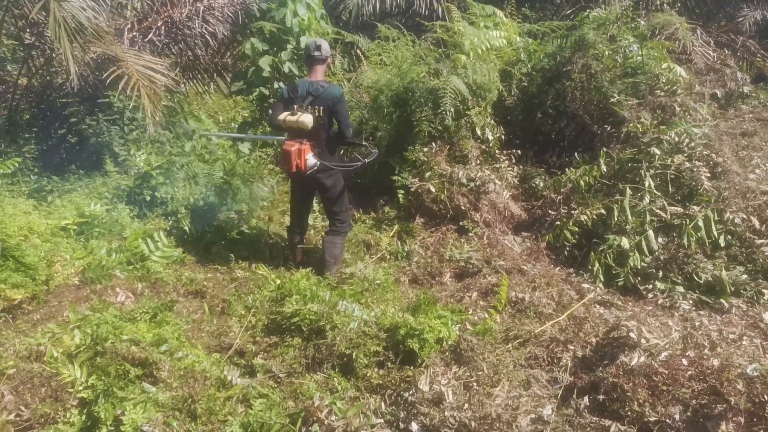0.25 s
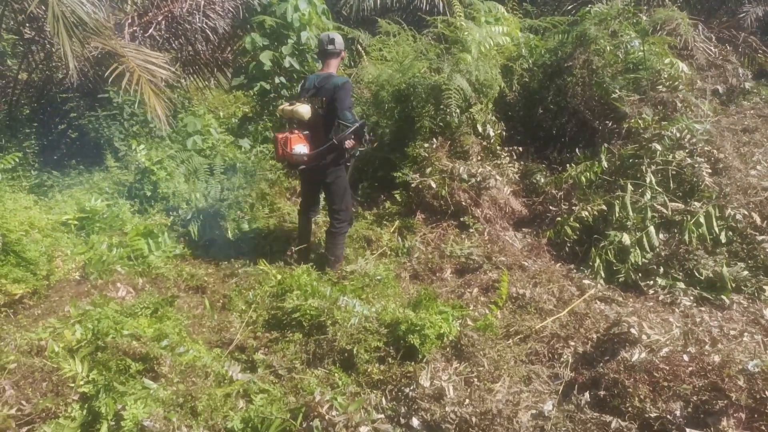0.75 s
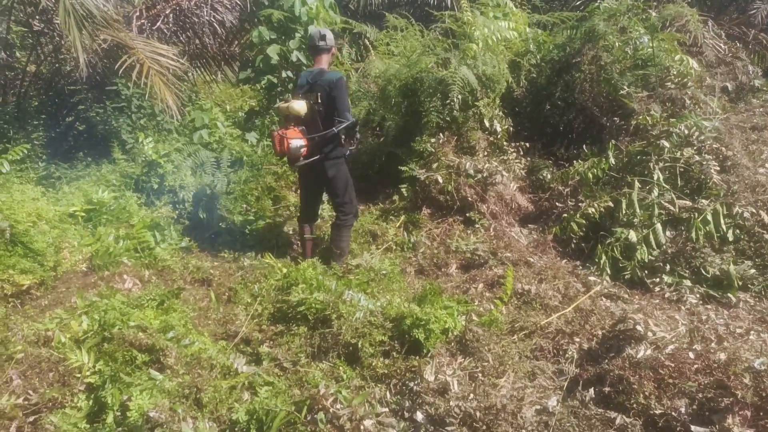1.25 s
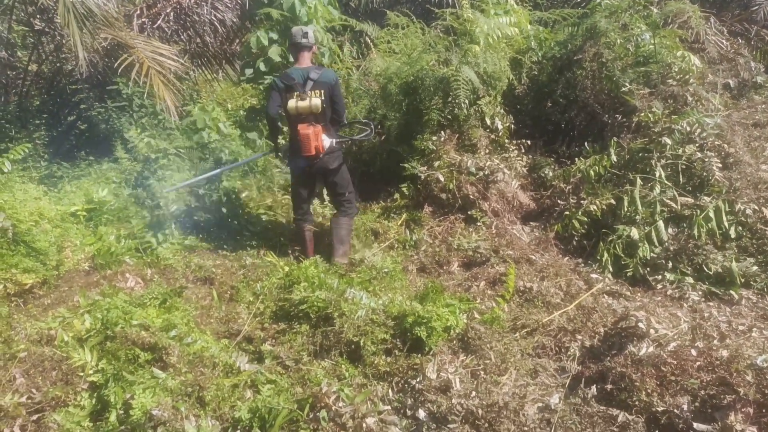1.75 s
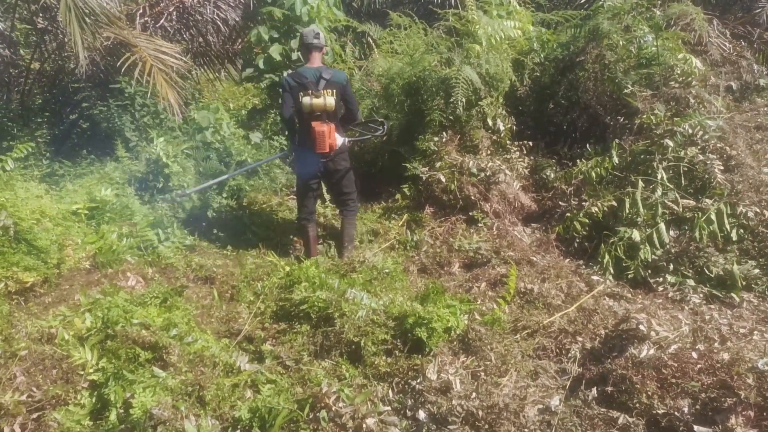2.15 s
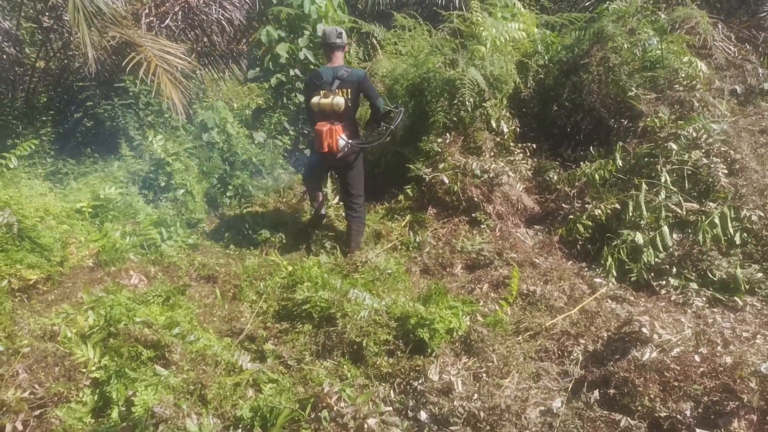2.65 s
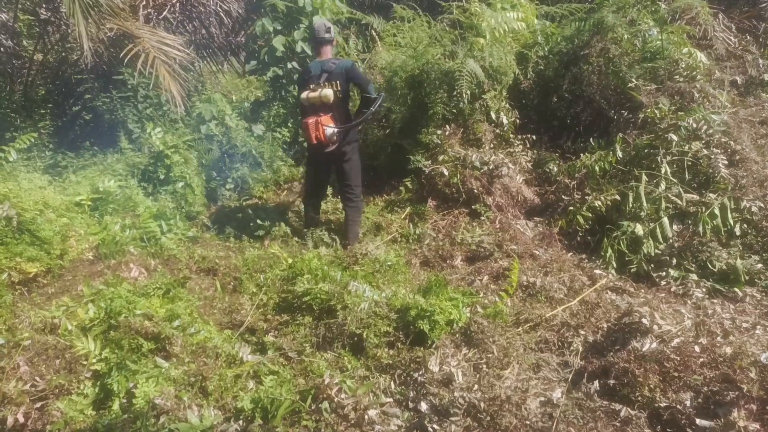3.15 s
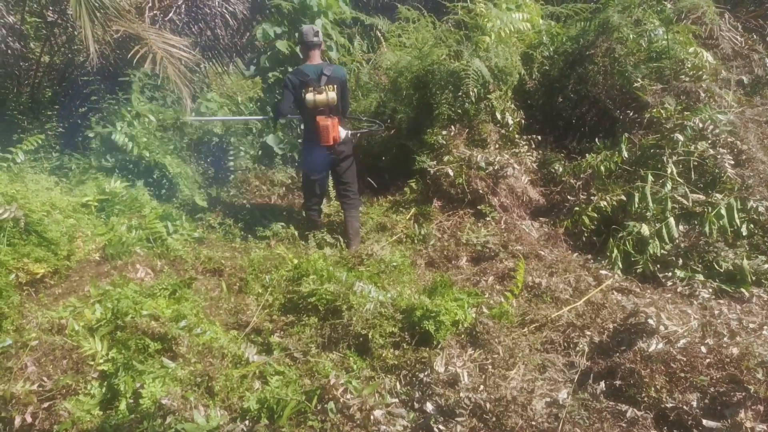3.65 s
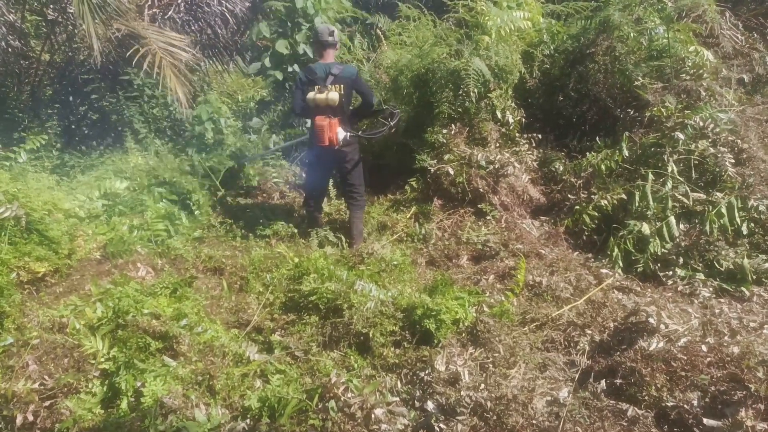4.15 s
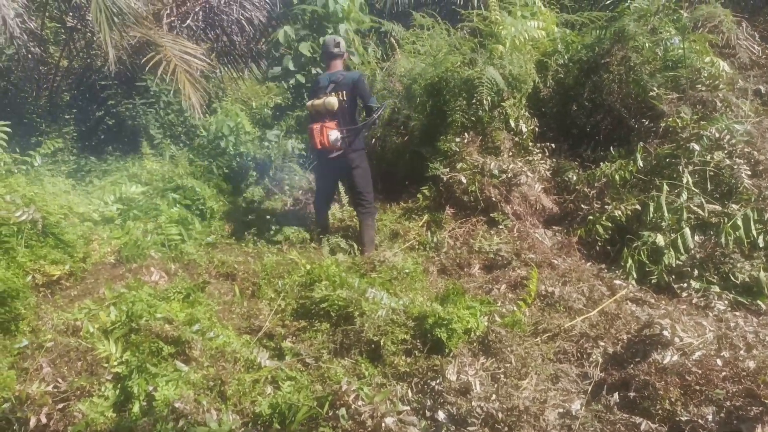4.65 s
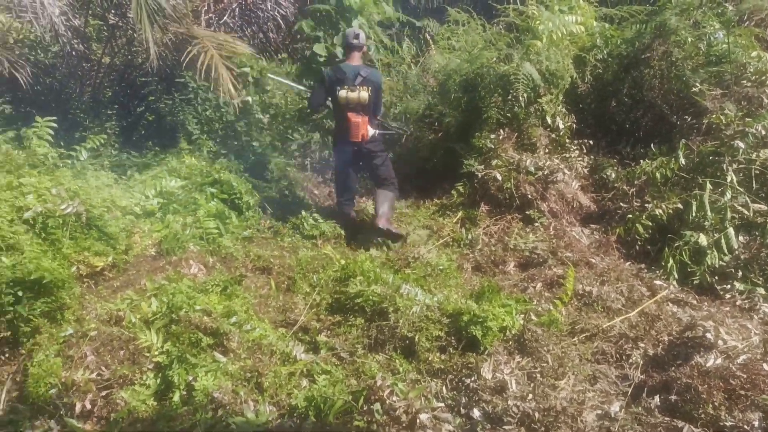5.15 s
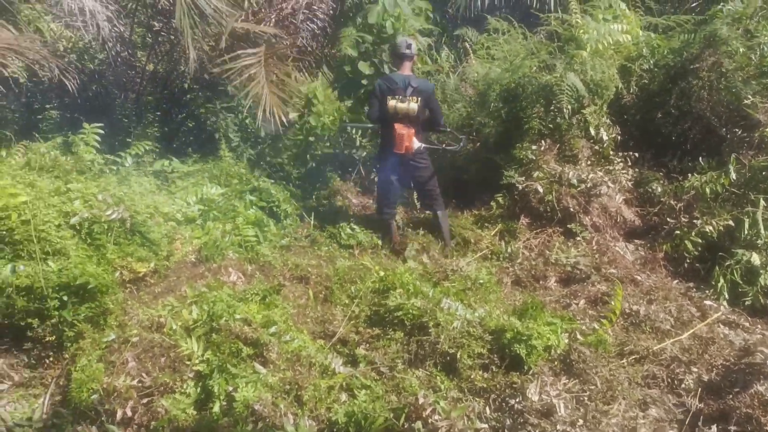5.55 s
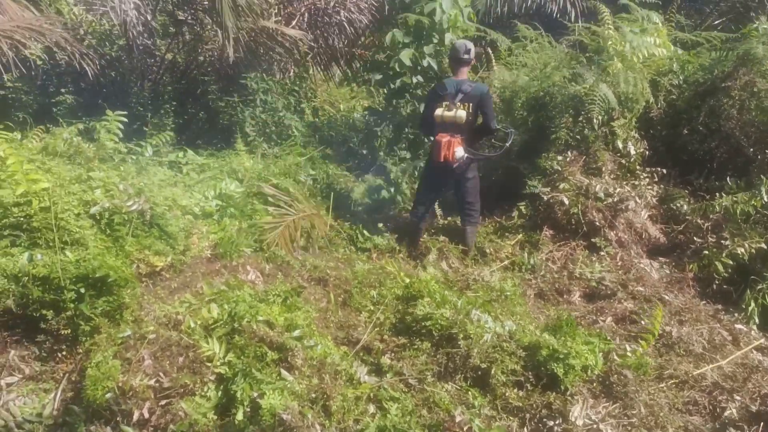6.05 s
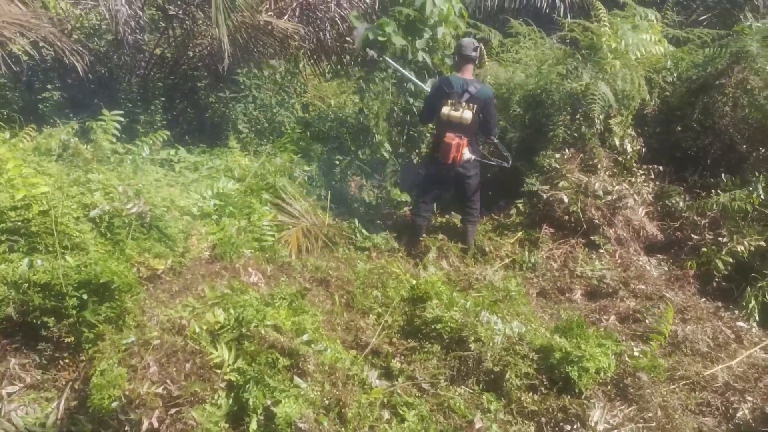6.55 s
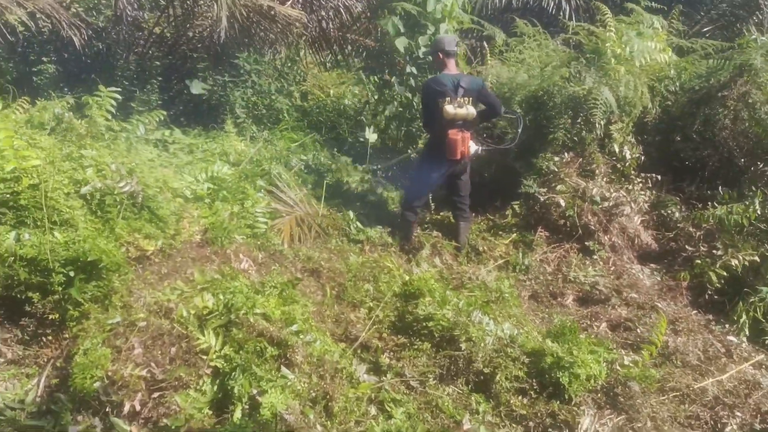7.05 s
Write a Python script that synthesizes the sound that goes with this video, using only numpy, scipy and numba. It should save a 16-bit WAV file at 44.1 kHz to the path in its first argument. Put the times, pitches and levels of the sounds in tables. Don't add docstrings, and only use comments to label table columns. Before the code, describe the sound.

Already running at 0 s, a backpack two-stroke brush cutter gives a hard, nasal, sputtering rasp a few metres from a phone outdoors. It fires about every second turn, often slipping a beat, so a rough burble sits under the buzzing stroke tones. Drive parts rattle and the blade hisses in grass and ferns, with short brighter swells in stems that briefly duck the engine. Small surges come in the first second and around 1.3 s; it steadies lower near 2 s, where a thin casing ring sings. Revs race around 3.3 s, sag by 3.7 s, climb again to about 4.8 s, and drop sharply after 5 s. From 5.3 s the stereo image shifts slightly as pitch surges repeatedly, near 5.7, 6.05 and 6.8 s, the panel ringing again. Bushes add a short dull echo over very faint low rumble. The engine is racing upward at 7.3 s, ending abruptly.

```python
import sys
import numpy as np
from scipy import signal
from scipy.fft import rfft, irfft
from scipy.io import wavfile
from scipy.ndimage import uniform_filter1d, map_coordinates
from numba import njit

SR = 44100
rng = np.random.default_rng(int(sys.argv[2]) if len(sys.argv) > 2 else 0)


def transcribe(signal):
    frames = np.atleast_2d(signal).T
    limited = np.clip(frames, -1, 1)
    pcm = np.round(limited * 32767).astype(np.int16)
    wavfile.write(sys.argv[1], SR, pcm)


def invert_db(level):
    return 10 ** (np.asarray(level, dtype=float) / 20)


N = 321489
TIME_S = np.arange(N) / SR
BIN_HZ = np.maximum(np.arange(N // 2 + 1) * SR / N, 1)
PORT_LAG_S, ENGINE_LAG_S = 0.0003047, 0.00016


def level(x, db):
    return x * invert_db(db) / np.sqrt(np.mean(x ** 2))


@njit
def svf(x, hz, width):
    y, b, l = np.empty(len(x)), 0., 0.
    g, k = np.tan(np.pi * hz / SR), width / hz
    for i in range(len(x)):
        v = (b + g * (x[i] - l)) / (1 + g * (g + k))
        b, l, y[i] = 2 * v - b, l + 2 * g * v, k * v
    return y


def curves(table):
    s, *columns = np.transpose(table)
    return [np.interp(TIME_S, s, c) for c in columns]


def walk(rate_hz):
    k = int(SR / rate_hz)
    held = np.repeat(rng.standard_normal(N // k + 1), k)[:N]
    return 1.467 * uniform_filter1d(uniform_filter1d(held, k), k)


def swells(at, size, rise, hold, fall):
    total = np.zeros(N)
    for a, s, r, h, f in np.broadcast(at, size, rise, hold, fall):
        total += np.interp(TIME_S, [a - r, a, a + h, a + h + f], [0, s, s, 0])
    return total


def ports(hz, table):
    points, *db = np.transpose(table)
    return np.array([invert_db(np.interp(np.log(hz), np.log(points), d)) for d in db])


def colour(pair, table):
    late = np.exp(-2j * np.pi * BIN_HZ * PORT_LAG_S * np.array([[0], [1]]))
    return irfft(rfft(pair) * ports(BIN_HZ, table) * late, N)


def noise_pair(likeness):
    common, left, right = rng.standard_normal((3, N))
    return np.sqrt(likeness) * common + np.sqrt(1 - likeness) * np.array([left, right])


def pulse_train(where, size):
    out, whole = np.zeros(N + 1), np.clip(where, 0, N - 1).astype(int)
    np.add.at(out, whole, size * (1 - where % 1))
    np.add.at(out, whole + 1, size * (where % 1))
    return out[:N]


# start in seconds, hiss swell in dB, hold in seconds, gain duck in dB.
STEM_BITES = [(0.032, -0.5, 0.016, 3.5), (0.144, 5, 0.011, 2), (0.7, 4.5, 0.033, 2.5),
              (0.784, 2.5, 0.07, 1.5), (0.924, 1, 0.035, -1), (1.051, 0, 0.038, 0), (1.485, 0.8, 0.18, 2),
              (2.35, 1.5, .05, -0.5), (2.488, 5.5, 0.11, 4), (2.62, 3.5, 0.11, 3), (2.763, 5.5, 0.04, 3),
              (3.036, 2.1, 0.033, 1.5), (3.37, -1, 0.055, 3), (3.486, -1, 0.013, 5),
              (3.618, 0.5, 0.14, 2.5), (3.819, 0.5, 0.026, 6.5), (4.023, 1.5, 0.038, -1),
              (4.203, 2.5, 0.081, -1), (4.33, 2.5, 0.079, 0.5), (4.648, 3, 0.12, 3), (4.794, 3, 0.02, 3.5),
              (4.858, 3.5, .08, 3.5), (4.949, 4, 0.13, 4), (5.162, 3.5, 0.054, -0.2), (5.305, 5, 0.043, 7),
              (5.549, 2, 0.096, 1.5), (5.959, 0.5, 0.054, 0), (6.21, 2, 0.05, 1), (7.103, 3.5, 0.026, 1),
              (7.261, 2, 0.041, -2)]


def bites():
    attack_s, release_s = 0.0098, 0.042
    start, swell_db, hold, duck_db = np.transpose(STEM_BITES)
    return [swells(start + attack_s, db, attack_s, hold, release_s) for db in (swell_db, duck_db)]


# start in seconds, state (1 keeps firing, 0 keeps missing), extra turns.
BEAT_SLIPS = [(.13, 0, 1), (.2, 0, 1), (.3, 1, 1), (.36, 0, 1), (.46, 1, 5), (.6, 0, 1), (.67, 1, 4),
              (.85, 1, 1), (1.13, 1, 3), (1.23, 1, 1), (1.29, 1, 2), (1.5, 0, 1), (1.77, 1, 7),
              (1.92, 1, 1), (3.0, 1, 2), (3.08, 1, 1), (3.71, 1, 2), (4.34, 1, 1), (4.78, 1, 4),
              (5.38, 0, 1), (5.52, 1, 2), (5.83, 1, 2), (5.9, 1, 1), (6.62, 0, 1), (6.71, 1, 1),
              (6.81, 1, 2), (6.9, 1, 1), (6.96, 1, 1), (7.03, 0, 1), (7.09, 1, 1)]


def firing_beat(times_s):
    fired = np.zeros(len(times_s))
    waiting = [(s, state) for s, state, turns in BEAT_SLIPS for turn in range(turns)]
    for k in range(1, len(times_s)):
        slip = bool(waiting) and times_s[k] >= waiting[0][0] and fired[k - 1] == waiting[0][1]
        fired[k] = waiting.pop(0)[1] if slip else 1 - fired[k - 1]
    return fired


# frequency in Hz, left in dB, right in dB.
BANG_SPECTRUM = [(35, -39, -37), (115, -4, -5.5), (196, -1, -1), (281, 3, 2.5), (424, -9, -12),
                 (498, -1.5, -1), (673, 3.5, 2.5), (850, -25, 6.5), (1020, 0.5, -3.5), (1160, -1, 2),
                 (1330, -0.5, -1), (1432, -33, -1), (1500, -19, -22), (1670, -19, -17.5)]


def bang(pulses):
    size, lateness = 4096, .33
    lean_rad = -0.48
    hz = np.maximum(np.arange(size // 2 + 1) * SR / size, 1)
    cepstrum = irfft(np.log(ports(hz, BANG_SPECTRUM)), size)
    cepstrum[:, 1:size // 2] *= 2
    cepstrum[:, size // 2 + 1:] = 0
    log_gain = rfft(cepstrum)
    phase = lateness * log_gain.imag + lean_rad
    response = np.roll(irfft(np.exp(log_gain.real + 1j * phase), size), size // 2, axis=1)
    return signal.fftconvolve(pulses[None], response, axes=1)[:, size // 2:size // 2 + N]


# multiple of the crank rate, level in dB.
STROKE_LINES = [(3, -9), (4, -3.5), (5, -8), (6, 1), (7, -4.5), (8, -4.5), (9, -19), (10, 8.5), (11, 3),
                (12, 0.5), (13, 7.5), (14, -3.5), (15, -7), (16, -28), (17, -6), (20, -16.5), (21, -15)]
# frequency in Hz, left in dB, right in dB.
SILENCER_GAIN = [(145, 11, 2), (356, -3, 2), (456, 10, -3), (620, 15.5, 10), (796, 4, 10.5), (852, 6.5, 13),
                 (1043, 12, -10), (1026.6, 9.5, 0), (1280, 9, 14)]


def strokes(turns, hz):
    step, thud_top, thud_lead_turns = 64, 4.5, 0.291
    shake_turns = .0018 * walk(60)
    lag_turns = hz * ENGINE_LAG_S * np.array([[0], [1]])
    out = 0
    for multiple, db in STROKE_LINES:
        gain = np.repeat(ports(multiple * hz[::step], SILENCER_GAIN), step, axis=1)[:, :N]
        if multiple < thud_top:
            angle = multiple * (turns + thud_lead_turns) - .14
        else:
            angle = multiple * (turns - lag_turns + shake_turns) - 0.023 * abs(13 - multiple) ** 1.442
        out = out + invert_db(db + 1.17 * walk(50)) * gain * np.cos(2 * np.pi * angle)
    return out


# time in seconds, facing in dB.
BODY_FACING = [(0, -1.5), (.15, -0.5), (.3, 1), (1.34, -3), (1.6, 0.5), (1.81, 1.5), (2.03, 2.5),
               (2.9, -0.5), (3.63, 0.5), (3.94, 4.5), (4.3, -0.3), (5.0, -0.5), (5.11, 3), (5.3, 2),
               (6.1, 2.5), (6.2, -2.5), (6.8, 3), (7.29, 1.5)]


def outlet(silencer):
    facing_db = curves(BODY_FACING)[0]
    upper = irfft(rfft(silencer) / (1 + (960 / BIN_HZ) ** 12), N)
    return silencer + (invert_db(0.65 * (facing_db - np.mean(facing_db))) - 1) * upper


# time in seconds, crank turns in Hz, exhaust boom in dB.
THROTTLE = [(0, 76.7, -40.5), (.36, 77.33, -36), (1.06, 80.64, -36), (1.54, 78.07, -38.5),
            (2.29, 77.88, -35), (2.74, 81.87, -36), (3.27, 91, -37.5), (3.69, 76.06, -38.5),
            (4.16, 78.14, -37.5), (4.73, 90.3, -34.5), (4.97, 89.7, -36.5), (5.05, 81.2, -39),
            (5.16, 79.4, -38.5), (5.52, 80.5, -35), (5.83, 85.8, -37), (6.29, 83.65, -37),
            (7.0, 87.95, -37), (7.29, 91.3, -38.5)]
# peak in seconds, extra turns in Hz, rise in seconds, fall in seconds.
SPEED_SURGES = [(.16, 2, 0.17, 0.15), (.55, 4.5, 0.16, 0.19), (.87, 4.5, 0.15, 0.18),
                (1.302, 7.5, 0.22, 0.21), (2.39, 1.08, 0.12, 0.077), (2.62, 3, 0.17, 0.13),
                (3.431, 4, 0.15, 0.22), (3.861, 1.5, 0.14, 0.16), (4.24, 1.45, 0.088, 0.43),
                (4.81, -2.5, 0.087, 0.13), (5.359, 4, .2, 0.17), (5.72, 8.5, 0.19, 0.13),
                (6.05, 7.5, 0.19, 0.067), (6.231, 5, 0.16, 0.047), (6.461, 3.5, .17, 0.17),
                (6.821, 5, 0.15, 0.15)]


def engine():
    throttle_hz, load_db = curves(THROTTLE)
    peak, extra, rise, fall = np.transpose(SPEED_SURGES)
    flywheel_s = 0.016
    hz = throttle_hz + swells(peak, extra, rise, 0, fall) + .28 * walk(9)
    hz = uniform_filter1d(hz, int(2 * flywheel_s * SR))
    turns = np.cumsum(hz) / SR

    duck_db = bites()[1]
    boom_db = load_db - duck_db + 0.34 * walk(18)
    ring_db = 6 + load_db - 0.99 * duck_db + 0.57 * curves(BODY_FACING)[0] + 0.82 * walk(16)
    crank_db = -6 + load_db - duck_db + 1.2 * walk(19)

    opening = np.interp(np.arange(1, int(turns[-1])), turns, np.arange(N))
    delay = 0.001555 * SR
    jitter, strength = rng.standard_normal((2, len(opening)))
    refire_share, weak_pop_share = 0.87, 0.12
    fired = firing_beat(opening / SR)
    fired = np.where(fired, np.where(np.roll(fired, 1), refire_share, 1), weak_pop_share)
    bangs = pulse_train(opening + delay + 3.6 * jitter, fired * invert_db(1.33 * strength))
    breath = bang(pulse_train(opening + delay, 1.29 * uniform_filter1d(fired, size=2)))
    heard = np.array([svf(side, 165.6, 92.0) for side in breath]) - bang(bangs)
    heard[1] = np.roll(heard[1], int(ENGINE_LAG_S * SR))

    stroke_growth = invert_db(0.21 * (hz - np.mean(hz)))
    exhaust = rfft(level(heard, 0) + level(strokes(turns, hz) * stroke_growth, -0.12))
    low = 1 / (1 + (BIN_HZ / 430) ** 12)
    boom = level(irfft(exhaust * low, N), 0)
    silencer = level(irfft(exhaust * (1 - low), N), 0)
    crank = np.sqrt(2) * np.sin(2 * np.pi * (turns - .35)) * invert_db(np.array([[.4], [-.6]]))

    gas = 0.14 * pulse_train(opening, np.ones(len(opening))) + bangs
    puff = signal.lfilter([1], [1, -np.exp(-1 / (0.0092 * SR))], gas)
    motor = invert_db(boom_db + 0.06) * boom + invert_db(ring_db + 0.5) * outlet(silencer) + invert_db(crank_db - 3.5) * crank
    return motor, puff


# time in seconds, share of the full port lag.
PAN_LAG = [(0, 1.), (5.3, 1.), (5.8, .85), (6.2, .68), (6.7, .75), (7.29, .82)]


def pan(pair):
    early = (1 - curves(PAN_LAG)[0]) * PORT_LAG_S * SR
    right = map_coordinates(pair[1], [np.arange(N) + early], order=3, mode="nearest")
    return np.array([pair[0], right])


# time in seconds, blade hiss in dB, drive rattle in dB.
BLADE_DEPTH = [(0, -21.5, -34.5), (.2, -26, -33), (.67, -26.5, -32), (1.15, -24.5, -37.5), (1.64, -22, -33),
               (1.85, -23.5, -34.5), (1.95, -28.5, -33.5), (2.2, -30, -32.5), (2.46, -26.5, -30),
               (3.0, -26.5, -36.5), (3.4, -21, -32.5), (3.86, -23, -33), (3.92, -27, -32),
               (4.6, -25.5, -33.5), (5.5, -26, -31.5), (6.25, -23, -33.5), (6.92, -27, -31),
               (7.29, -22.5, -31.5)]
# frequency in Hz, left in dB, right in dB.
RATTLE_SPECTRUM = [(70, -45, -46), (960, -4, 0), (1390, 4.5, 9), (1650, -8, -5.5), (2115, 3.5, 7.5),
                   (2650, 3, 5), (3000, 6.5, 4), (3150, -7, -2.5), (3500, 8, 4), (3630, -4.5, -1.5),
                   (4460, 3, 1), (5100, 0.5, -4), (5560, -1, -0.5), (7600, -8.5, -5), (9200, -13, -6)]
# frequency in Hz, left in dB, right in dB.
HISS_SPECTRUM = [(2680, -23.5, -26), (6460, -17.5, -15.5), (6930, -12, -17.5), (8560, 1, -6),
                 (9380, -7, -1.5), (9700, -5.5, 2), (11740, -11.5, -2), (13000, -17.5, -4),
                 (16000, -14.5, -14)]


def cutting(puff):
    swell_db, duck_db = bites()
    depth_db, drive_db = curves(BLADE_DEPTH)
    hiss_db = depth_db + swell_db
    rattle_db = drive_db - 0.79 * duck_db - 0.083 * swell_db + .7 * walk(12)
    rattle = noise_pair(.62) * (1 + 0.78 * puff) * invert_db(0.64 * walk(30))
    rattle = pan(colour(rattle, RATTLE_SPECTRUM))
    snaps = invert_db(np.array([1.5 * walk(300) + 0.61 * walk(12) for port in range(2)]))
    hiss = colour(noise_pair(0.11) * (1 + 0.049 * puff) * snaps, HISS_SPECTRUM)
    pan_db = 6.1 * (1 - curves(PAN_LAG)[0]) + 1.7 * walk(17)
    sway = invert_db(np.array([[.5], [-.5]]) * (pan_db - np.mean(pan_db)))
    return invert_db(rattle_db) * level(rattle, 1.76) + invert_db(hiss_db) * sway * level(hiss, 2.36)


# peak in seconds, swell in dB, half length in seconds.
PANEL_SWINGS = [(0.39, 14, 0.43), (1.985, 16, .15), (2.4, 13.5, 0.77), (4.601, 1, .1), (5.986, 7, 0.37),
                (6.557, 10, 0.14), (6.85, 11.5, 0.26)]


def panel(puff):
    shaken = rng.standard_normal(N) * (1 + 0.5 * puff)
    mode = svf(svf(shaken, 1834.0, 73.0), 1840.0, 105.0)
    at, swell_db, half = np.transpose(PANEL_SWINGS)
    db = -66.5 + 3 * TIME_S + swells(at, swell_db, half, 0, half)
    return invert_db(db + np.array([[.6], [-9]])) * level(mode, 0)


# frequency in Hz, level in dB.
RUMBLE_SPECTRUM = [(10, -20), (25, -7), (50, 1), (70, -10), (120, -50)]


def rumble():
    return level(colour(noise_pair(0.99), [(hz, db, db) for hz, db in RUMBLE_SPECTRUM]), -76)


def bushes(x):
    t = np.arange(4000) / SR
    scatter = rng.standard_normal((2, len(t))) * invert_db(-60 * t / 0.16) * (t > .003)
    soft = signal.lfilter([1], [1, -.6], scatter)
    return signal.fftconvolve(x, soft / np.sqrt(np.sum(soft ** 2) / 2), axes=1)[:, :N]


def scene():
    motor, puff = engine()
    above_boom = signal.sosfilt(signal.butter(2, 420, "high", fs=SR, output="sos"), motor)
    return motor + invert_db(-25) * bushes(above_boom) + cutting(puff) + panel(puff) + rumble()


def roll_off(x):
    return signal.sosfilt(signal.butter(12, 15490, fs=SR, output="sos"), x)


def record(dry):
    cut = signal.sosfilt(signal.butter(2, 45, "high", fs=SR, output="sos"), dry)
    return roll_off(np.tanh(1.1 * cut) / 1.1)


dry = scene()
out = record(dry)
transcribe(out)
```